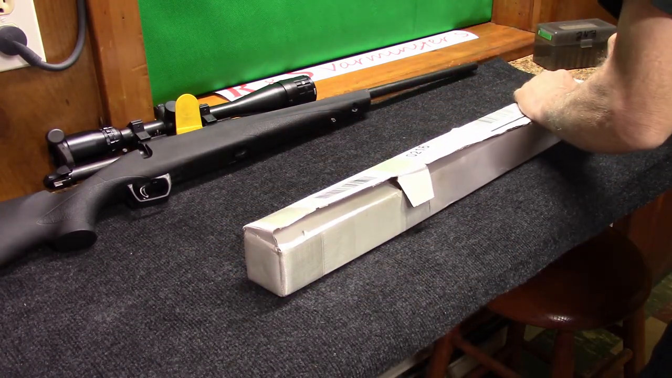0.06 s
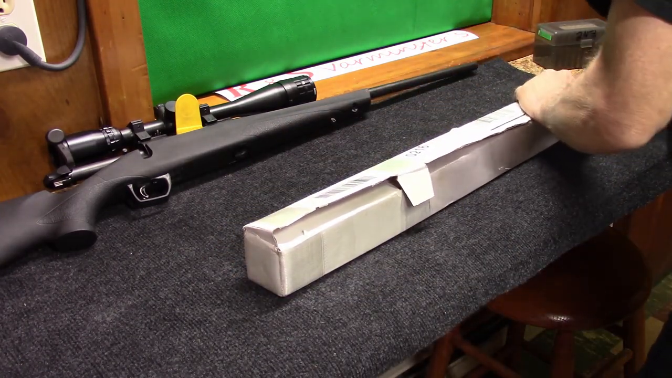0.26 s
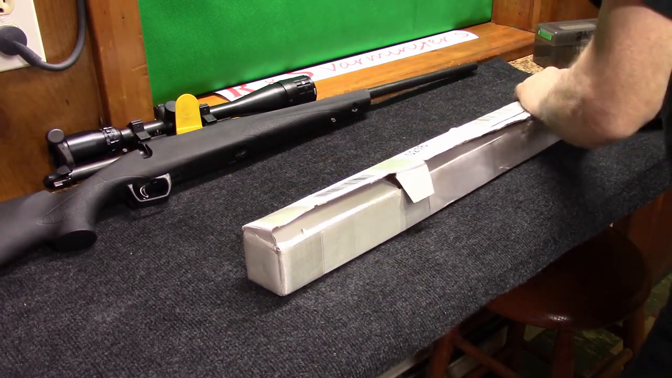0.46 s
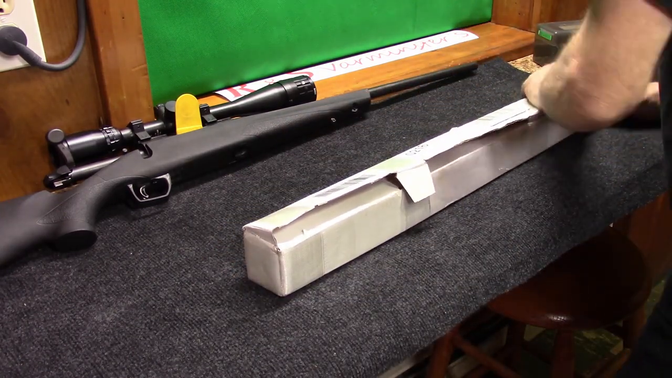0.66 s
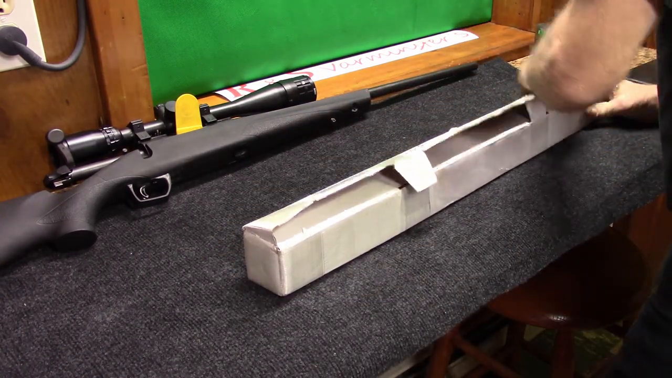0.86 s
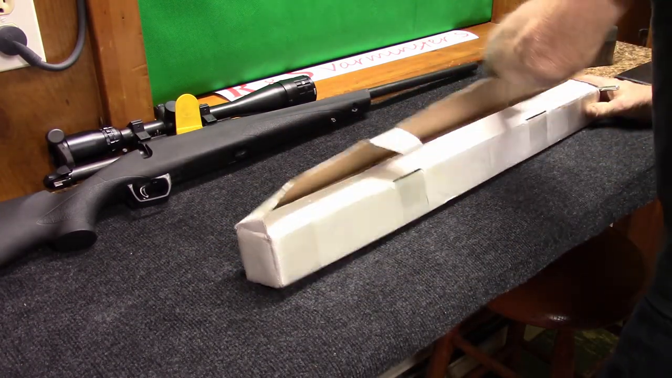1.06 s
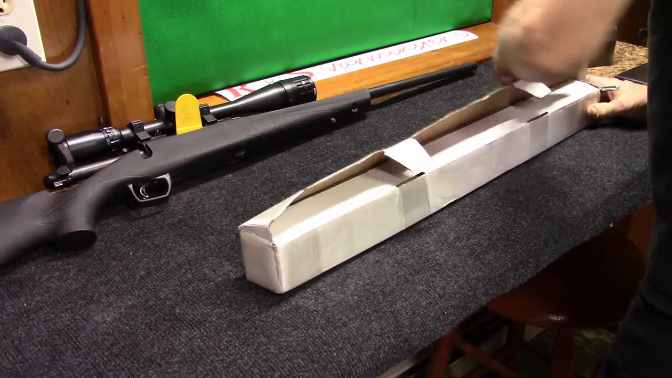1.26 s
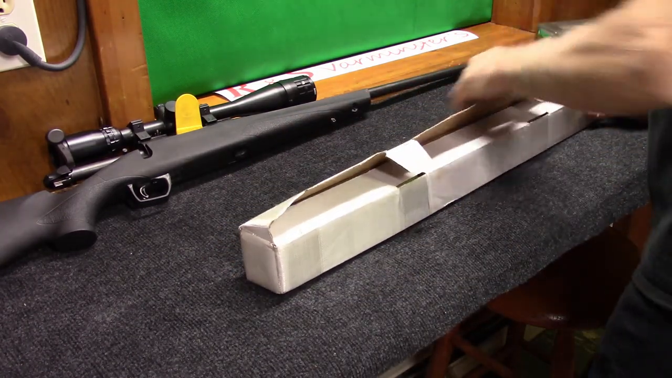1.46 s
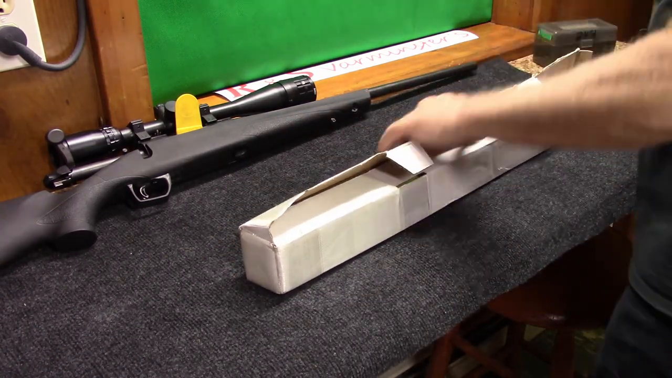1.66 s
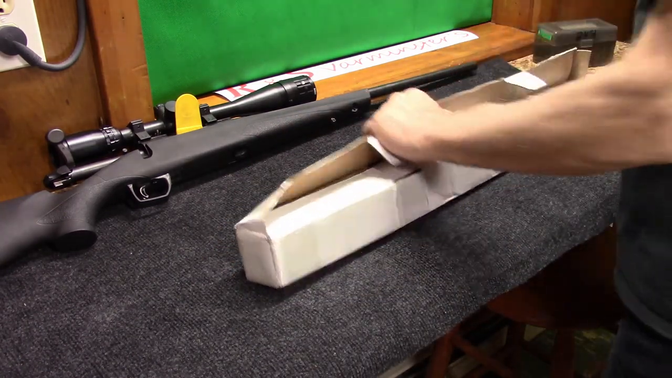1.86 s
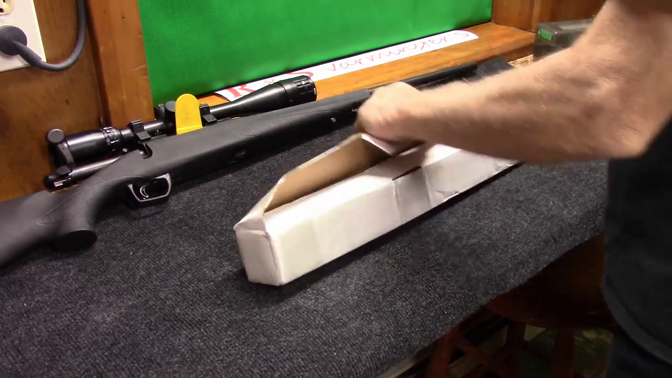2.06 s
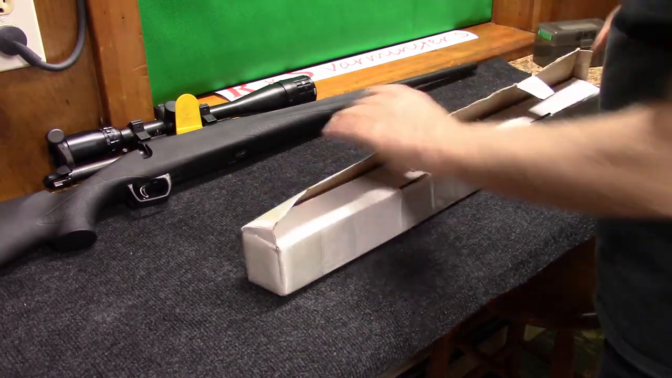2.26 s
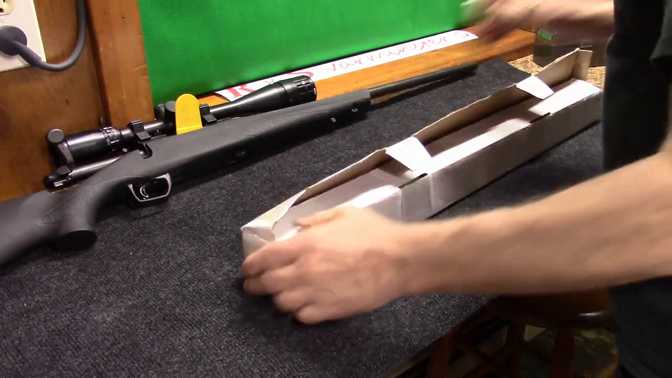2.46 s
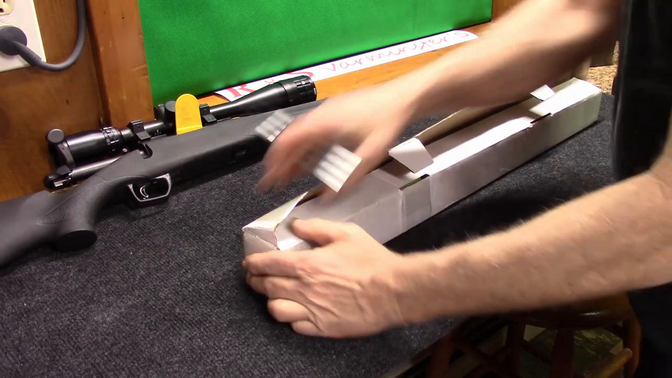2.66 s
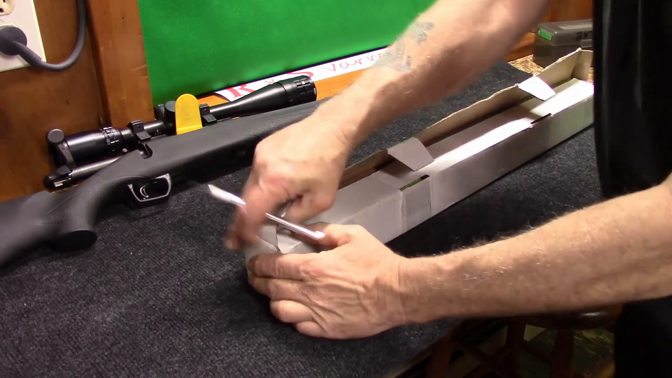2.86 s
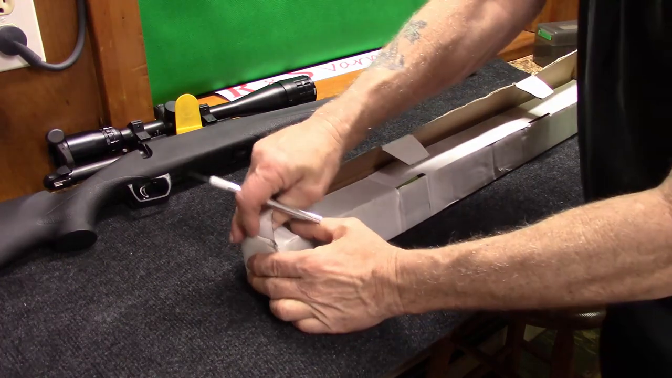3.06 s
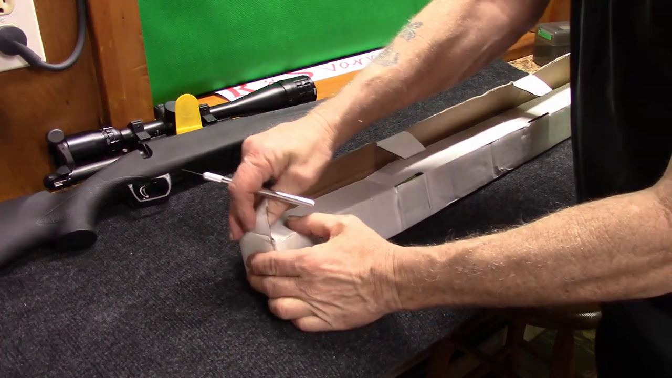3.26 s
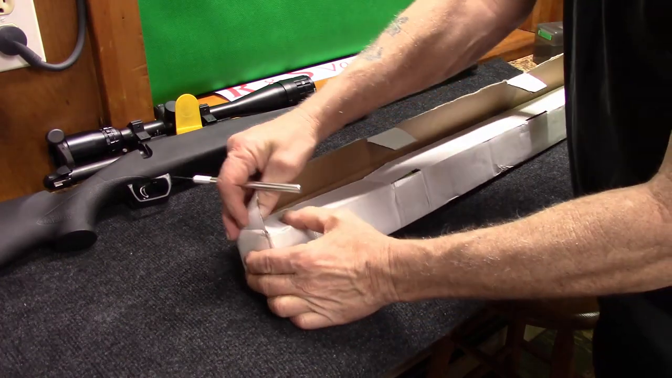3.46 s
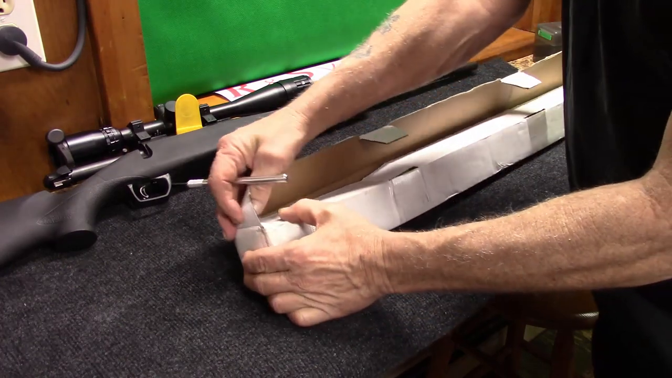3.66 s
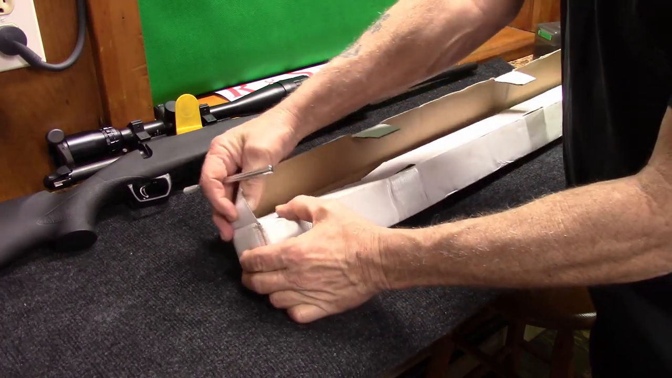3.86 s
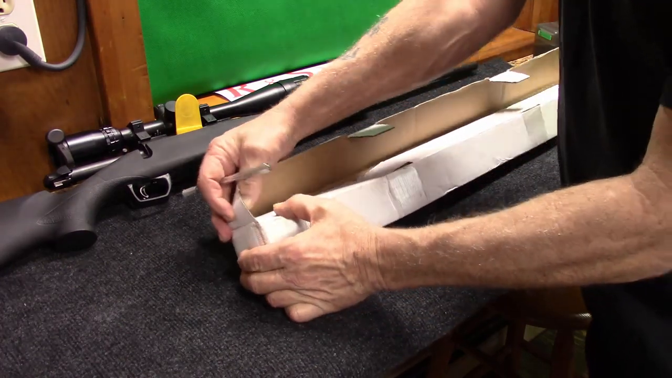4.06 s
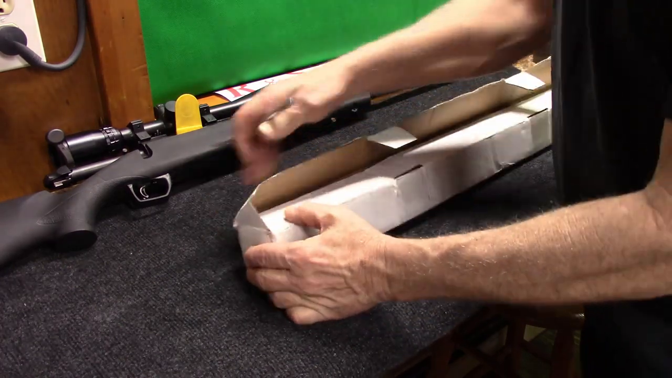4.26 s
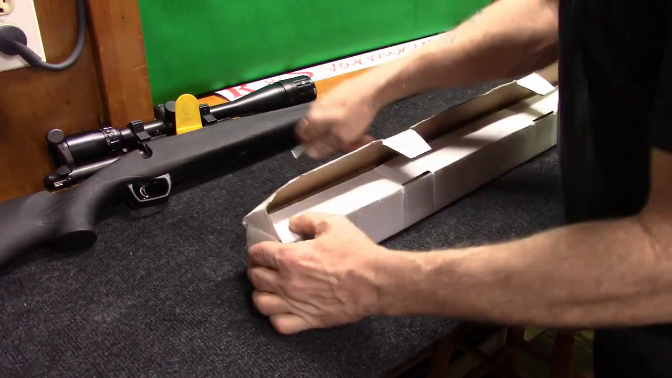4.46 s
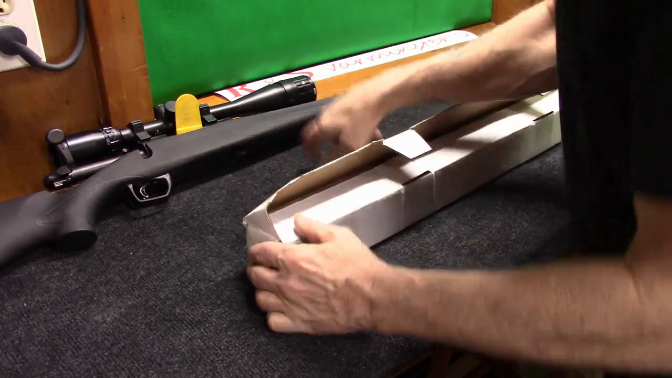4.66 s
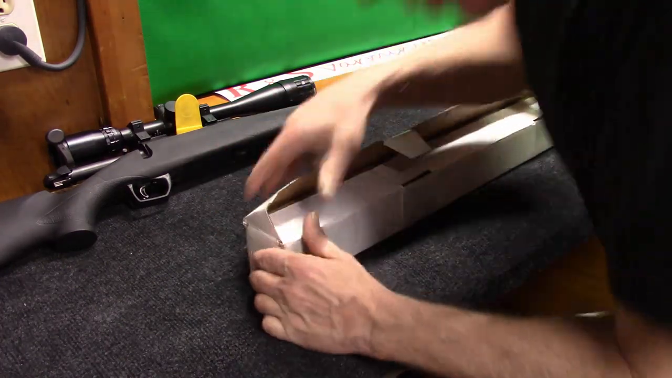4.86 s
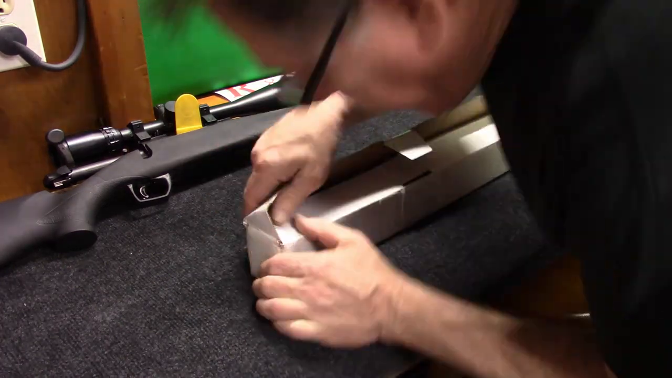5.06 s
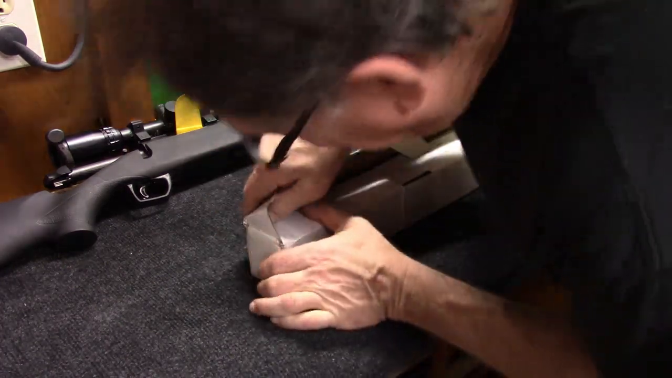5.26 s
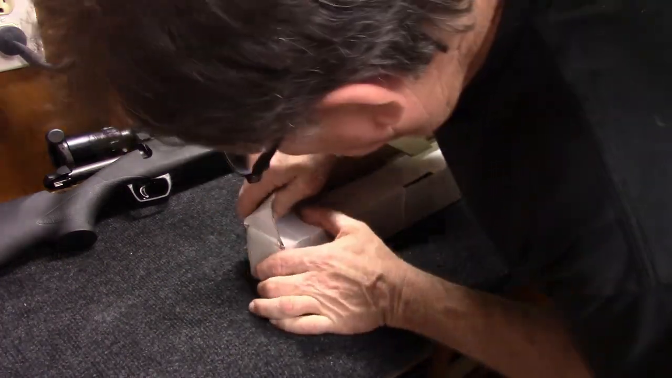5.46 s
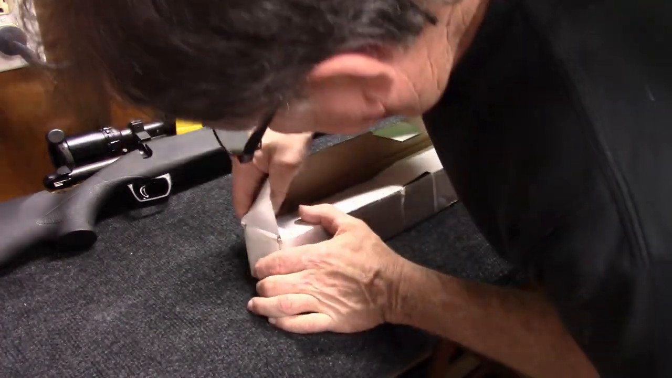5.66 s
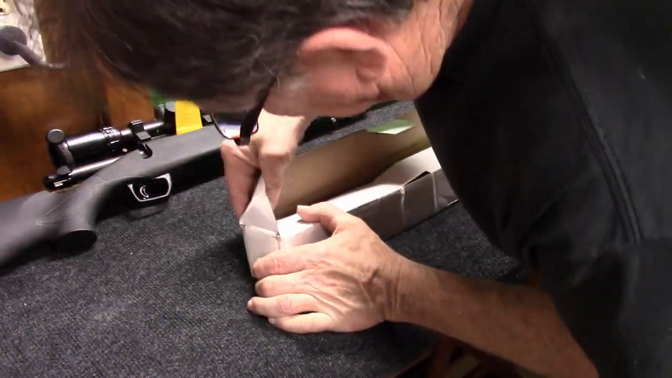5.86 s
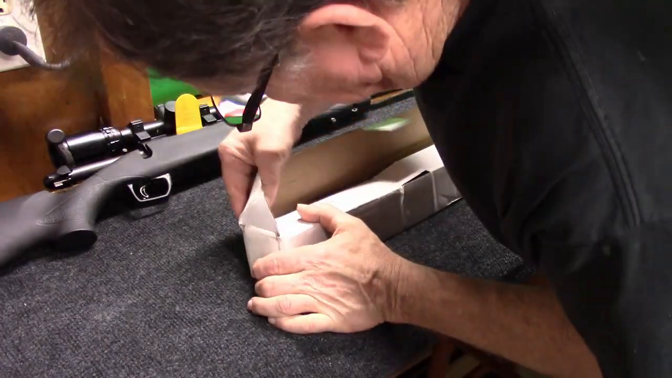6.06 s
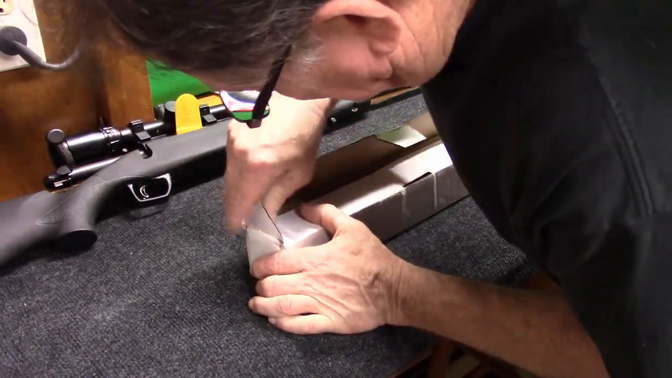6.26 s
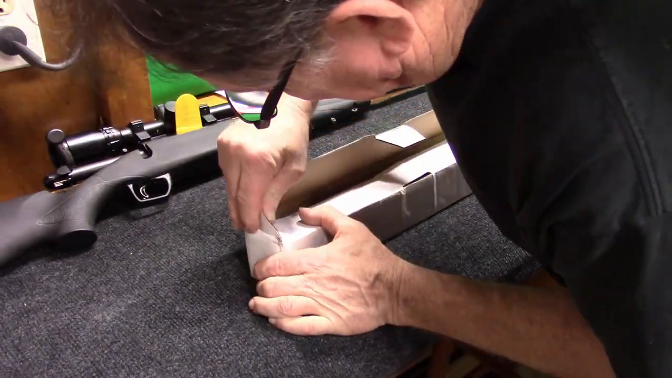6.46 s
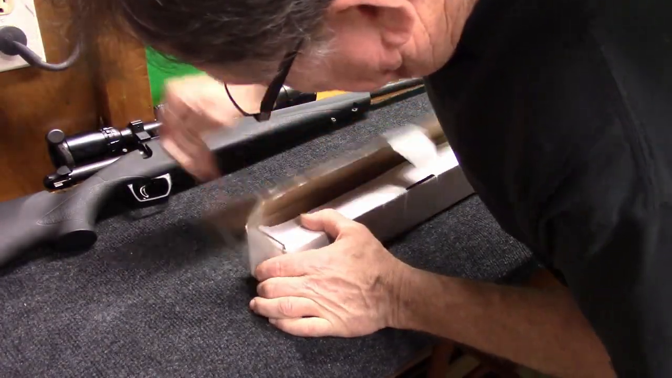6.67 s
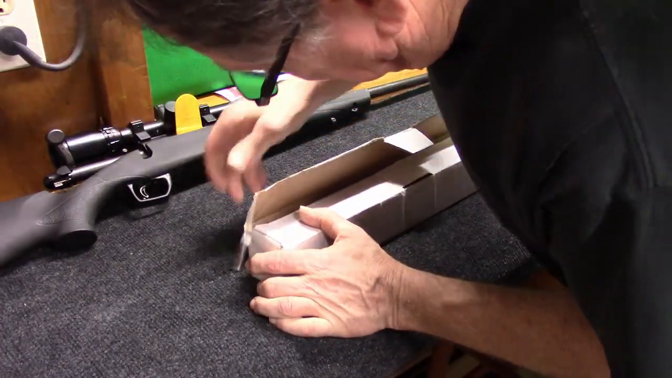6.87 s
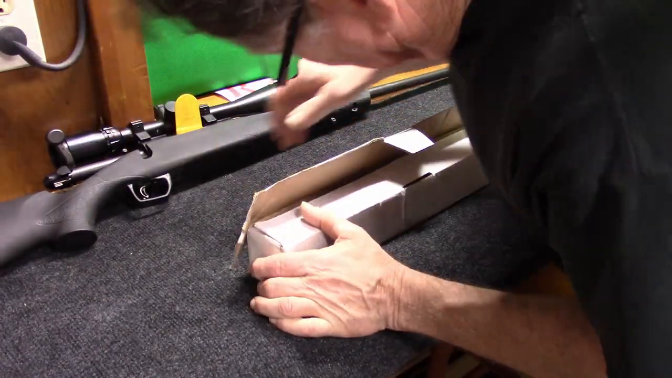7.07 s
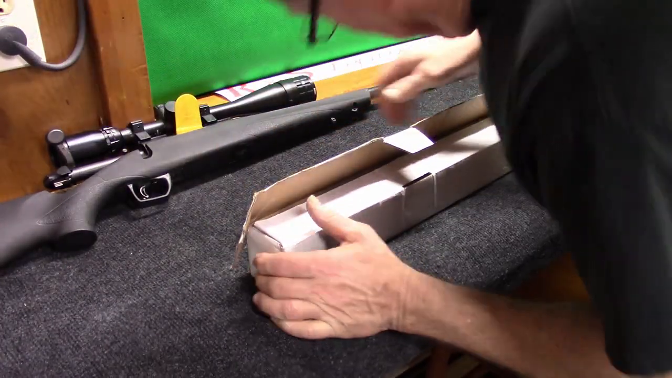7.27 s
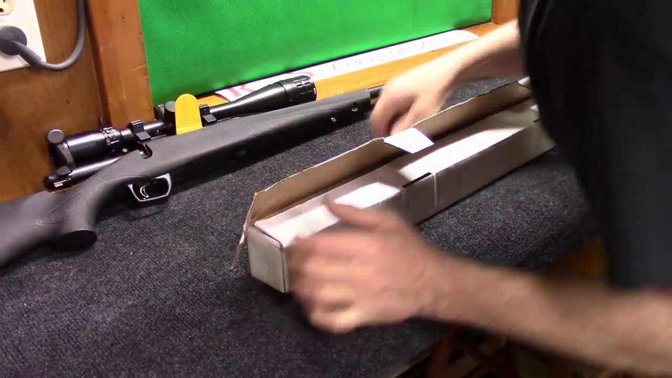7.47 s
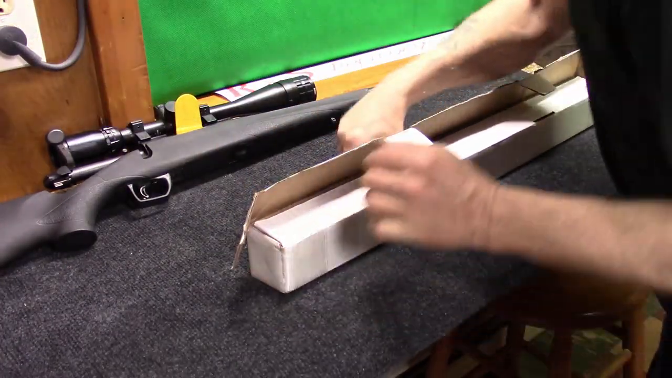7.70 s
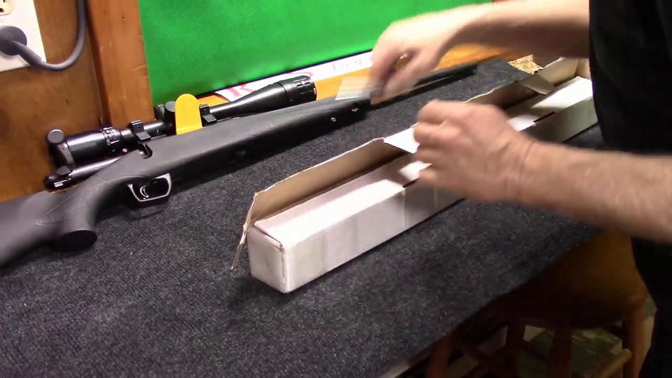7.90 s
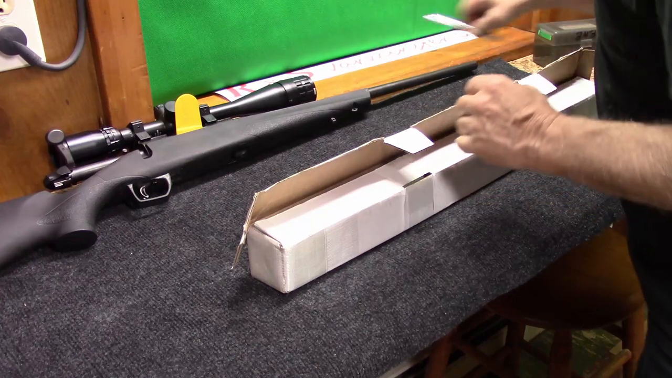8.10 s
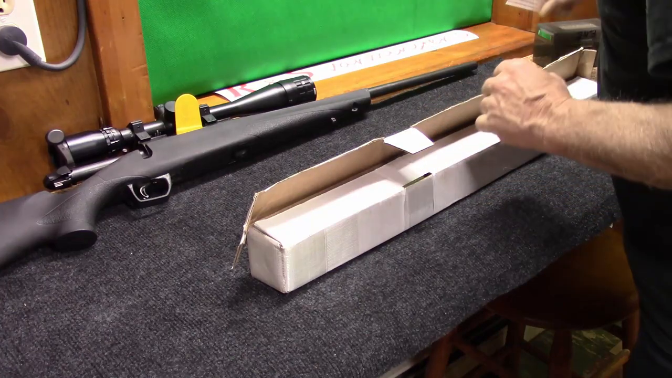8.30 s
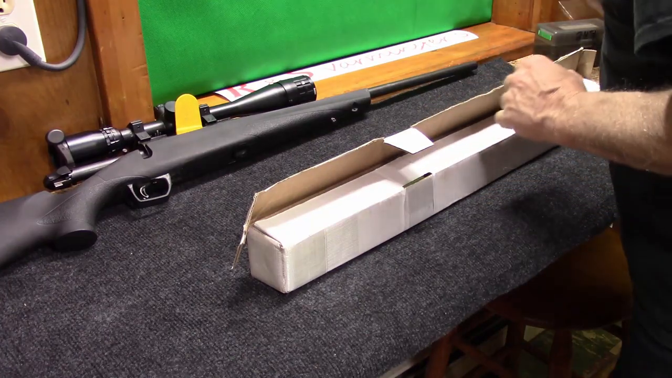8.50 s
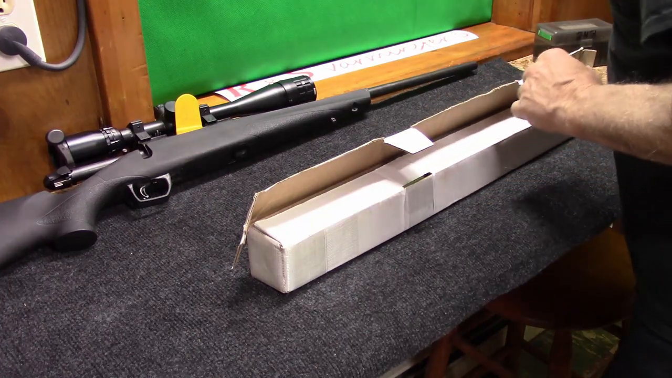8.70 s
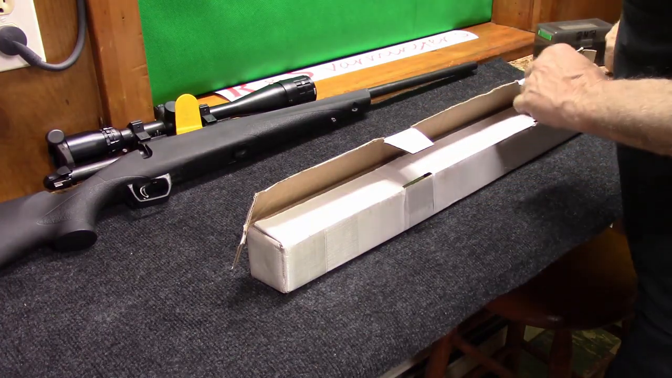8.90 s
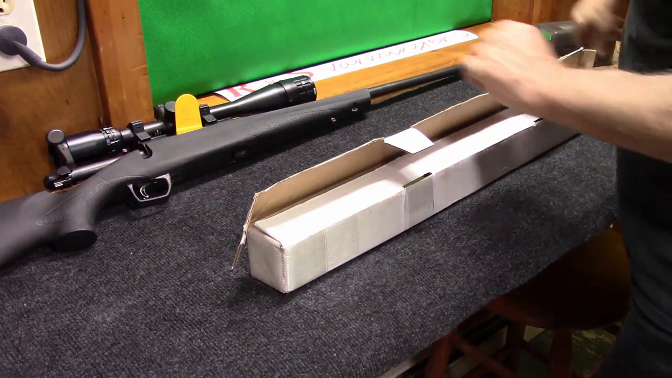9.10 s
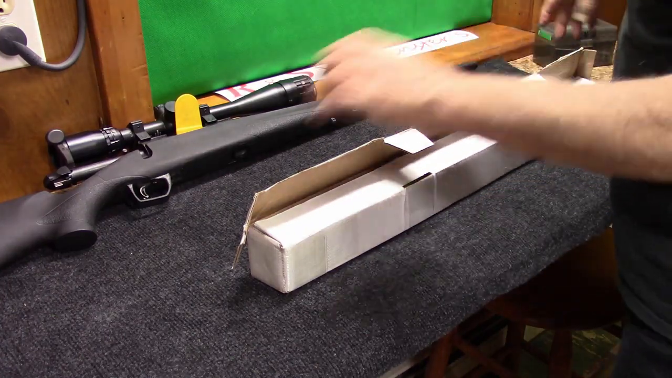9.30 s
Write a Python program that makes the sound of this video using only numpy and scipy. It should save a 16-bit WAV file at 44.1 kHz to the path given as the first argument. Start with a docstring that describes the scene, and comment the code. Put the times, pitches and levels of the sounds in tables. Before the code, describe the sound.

A low steady rush and faint quick motor ticking sit behind a long cardboard box being opened on a bench. A flap scrapes, then rips free with a loud crack. Hands slide over the board, a knife saws in short rasps, and the end tears with hard hollow snaps. Later the knife clacks down at a distance and a sleeve swishes. Close microphone, small short-decay room.

```python
"""A steady low rush, a faintly ticking motor and a scraping flap open the scene in a small workshop.
A long cardboard box is opened on a bench: creases snap, tape and board rip, the hollow box thumps,
hands slide over the board and a knife saws at the tape. Late on the knife is put down and a sleeve brushes past.
Rubbing is shaped noise and clicks under pressure curves; blows are noise bursts and decaying modes;
all but the rush, the motor and the bench pass through a synthetic stereo room."""
import sys
import numpy as np
from scipy import signal
from scipy.fft import rfft, irfft, next_fast_len
from scipy.io import wavfile

SR = 44100
rng = np.random.default_rng(int(sys.argv[2]) if len(sys.argv) > 2 else 0)


def put_to_file(sound):
    """Save the sound as 16-bit audio at rate SR, in the file named by the first command-line argument."""
    columns = np.atleast_2d(sound).T  # one column per channel
    safe = np.clip(columns, -1, 1)
    whole_steps = np.round(safe * 32767)
    wavfile.write(sys.argv[1], SR, whole_steps.astype(np.int16))


N = 411894
TIME = np.arange(N) / SR
TAIL = TIME[:SR // 2]  # time axis of a single event, half a second

# Strokes of the far flap scraping along the box. Each row: start in seconds, rise in seconds,
# hold in seconds, then the levels in dB of the low drag, the middle rasp and the high hiss.
SCRAPES = [(0.0, 0.041, 0.047, -40, -48, -60.5), (0.109, 0.031, 0.007, -37, -44.5, -50),
           (0.249, 0.052, .01, -48.5, -58, -58.5), (.405, 0.012, 0.033, -42, -46.5, -48),
           (.45, .02, .045, -34.5, -40, -44), (.565, .02, 0.16, -44.5, -50.5, -52.5),
           (.7, 0.036, 0.064, -37, -49, -57)]
# Strokes of hands and flaps sliding. Each row: start, rise and hold in seconds,
# drag on the panels, rasp of the edges and hiss of the surface in dB.
SLIDES = [(.93, 0.024, 0.095, -52.5, -54.5, -56.5), (1.162, 0.01, .19, -48.5, -50.5, -56),
          (1.24, 0.043, 0.067, -59, -63, -48.5), (1.585, 0.023, .07, -50.5, -54, -54),
          (1.66, 0.021, 0.026, -47.5, -51, -49.5), (1.77, 0.0065, 0.0093, -53, -58.5, -66),
          (1.82, 0.14, 0.047, -45.5, -53.5, -57.5), (2.08, 0.026, 0.053, -46.5, -53, -57.5),
          (2.18, .02, 0.086, -55, -65.5, -68.5), (2.455, 0.014, 0.08, -49.5, -52, -53),
          (2.615, .02, 0.13, -50, -53.5, -53.5), (2.76, 0.028, 0.15, -45, -52, -62),
          (2.93, 0.035, 0.14, -51.5, -58, -61), (4.05, 0.083, 0.018, -41.5, -49.5, -51),
          (4.18, 0.043, 0.078, -50, -60, -64), (4.285, 0.012, 0.026, -42.5, -47.5, -52.5),
          (4.43, 0.029, 0.0084, -51.5, -56.5, -59), (4.49, 0.033, 0.031, -55.5, -59, -67),
          (4.62, 0.023, .04, -51.5, -60, -64.5), (4.76, 0.09, 0.076, -60, -64, -68),
          (4.96, 0.02, .14, -48.5, -57.5, -60), (5.17, 0.078, 0.026, -44, -50, -53.5),
          (5.33, 0.084, 0.064, -50.5, -61.5, -67), (5.45, 0.055, 0.022, -49.5, -52.5, -57),
          (6.03, .11, .03, -46, -51, -56.5), (6.235, .03, 0.017, -44, -51, -50.5),
          (6.32, .03, 0.11, -53, -64.5, -74), (6.42, 0.063, .03, -44.5, -59.5, -64),
          (6.79, .03, 0.079, -53, -74, -73), (6.93, 0.052, 0.087, -56, -68, -73),
          (7.062, .008, 0.017, -44.5, -51, -66), (7.16, .012, 0.013, -51, -56.5, -59)]
# Resonances of the box. Each row: frequency in Hz, width in Hz, height in dB.
BOX = [(335, 7.7, 5.5), (439, 18, 3), (600, 11, 4.5), (693, 26, 3.5), (1070, 440, 1), (1420, 360, 1),
       (1930, 46, 2.5), (2300, 280, 1), (2710, 170, 1)]


def undb(db):
    """Level to amplitude: 20 dB is a factor of ten."""
    return 10 ** (np.asarray(db) / 20)


def unit(x):
    """Normalization of a steady signal to rms 1."""
    return x / np.sqrt(np.mean(x ** 2))


def burst(x):
    """Normalization of a transient by energy, to that of 4 ms at rms 1."""
    return x / np.sqrt(np.sum(x ** 2) / (.004 * SR))


def add(out, s, x):
    """Superposition: mix x in at time s."""
    i = int(s * SR)
    out[..., i:i + x.shape[-1]] += x[..., :N - i]


def band(x, lo_hz, hi_hz):
    """Causal band-pass: only components between two frequencies remain strong."""
    return signal.sosfilt(signal.butter(3, [lo_hz, hi_hz], "band", fs=SR, output="sos"), x)


def colour(x, points, modes=()):
    """Minimum-phase filtering: a smooth spectrum of (Hz, dB) points with resonances on top."""
    size = next_fast_len(len(x) // 2 + 1) * 2
    hz = np.maximum(np.arange(size // 2 + 1) * SR / size, 1)
    f, db = np.transpose(points)
    db = np.interp(np.log(hz), np.log(f), db)
    for centre, width, height_db in modes:
        db = db + height_db / (1 + (2 * (hz - centre) / width) ** 2)
    # folding the cepstrum onto positive times makes the filter causal
    cepstrum = irfft(np.log(undb(db)))
    cepstrum[1:size // 2] *= 2
    cepstrum[size // 2 + 1:] = 0
    response = np.exp(rfft(cepstrum))
    return irfft(rfft(x, size) * response)[:len(x)]


def split(x, order=5):
    """Complementary band division: low, middle and high parts that add up to the whole."""
    mid_hz, high_hz = 1600, 4600
    spectrum = rfft(x)
    hz = np.arange(len(spectrum)) * SR / len(x)
    low, below = (irfft(spectrum / (1 + (hz / edge) ** (2 * order)), len(x)) for edge in (mid_hz, high_hz))
    return low, below - low, x - below


def wander(t, rate, count=1000):
    """Slow random modulation: normal values, rate of them a second, joined by straight lines."""
    return np.interp(t * rate, np.arange(count), rng.standard_normal(count))


def room(wet_db, side_db=-20.5, build_s=0.0017):
    """Reverberation: direct sound, then dense reflections that decay at a rate set by frequency band."""
    # Reverberation times in seconds of the low, middle and high bands.
    decay_t60 = (0.21, 0.19, 0.15)
    decays = undb(-60 * TAIL / np.array(decay_t60)[:, None])
    fades = decays * (1 - np.exp(-TAIL / build_s))
    mid, side = (np.sum(fades * split(rng.standard_normal(len(TAIL))), axis=0) for _ in range(2))
    # the treble spreads sideways most
    side_spectrum = [(60, -9.5), (280, -19), (600, -5.5), (1200, 0.5), (2300, 3.5), (4200, 10.0), (12000, 8.5)]
    side = undb(side_db) * colour(side, side_spectrum)
    response = undb(wet_db) * np.array([mid + side, mid - side]) / np.sqrt(np.sum(mid ** 2))
    response[:, 0] += 1
    return response / np.sqrt(1 + undb(2 * wet_db))


def heard(x, response):
    """Convolution: every instant of the sound excites the room's response."""
    return signal.fftconvolve(x[None], response, axes=1)[:, :N]


def stroke(t, rise_s, hold_s, release_db_s):
    """Contact pressure: it builds, holds, then lets go exponentially."""
    build = np.clip(t / rise_s, 0, 1) ** 0.99
    return build * undb(-release_db_s * np.maximum(t - rise_s - hold_s, 0))


def friction(strokes, spectrum, release_db_s, rate, spread_db, smooth, catch_db, catch_rate, wet_db):
    """Stick-slip friction: fibres catch and let go as tiny uneven clicks that shake the panels, rasp and hiss."""
    out, size = np.zeros((2, N)), len(TAIL)
    for s, rise_s, hold_s, *levels in strokes:
        moments = rng.random(size) < rate / SR  # rate is the mean number of slips a second
        signs = rng.choice([-1, 1], size)
        sizes = undb(spread_db * np.minimum(rng.standard_normal(size), 2))
        force = unit(moments * signs * sizes) + smooth * rng.standard_normal(size)
        force = force * undb(catch_db * wander(TAIL, catch_rate))
        parts = split(colour(force, spectrum, BOX))
        sound = sum(unit(part) * undb(db) for part, db in zip(parts, levels))
        add(out, s, heard(sound * stroke(TAIL, rise_s, hold_s, release_db_s), room(wet_db)))
    return out


def air(level_db=-58.5, side_db=-16):
    """Broadband background noise: the steady low rush of the workshop, wavering slightly."""
    # Spectrum of the rush. Each row: frequency in Hz, relative level in dB.
    rush_spectrum = [(15, -40), (25, -22), (74, -14.5), (130, -10.5), (217, -7.5), (293, -12), (335, -4.5),
                     (384, -8.5), (416, -8), (591, -9.5), (1260, -15.5), (1480, -13.5), (1790, -17),
                     (5730, -24.5), (16000, -38)]
    modes = [(333, 190, 3.1), (420, 92, 2.5)]
    mid, side = (unit(colour(rng.standard_normal(N), rush_spectrum, modes)) for _ in range(2))
    side_spectrum = [(30, 3.5), (120, 7.5), (350, 7), (1500, 6.5), (5000, 7.5), (14000, 0.5)]
    side = undb(side_db) * colour(side, side_spectrum)
    waver_db = .4 * wander(TIME, 5)
    return np.array([mid + side, mid - side]) * undb(level_db + waver_db)


def motor(db=-57, tick_s=0.0051):
    """Periodic excitation: even, decaying ticks of mechanical noise, alternately stronger and weaker."""
    # Spectrum of the ticks. Each row: frequency in Hz, relative level in dB.
    tick_spectrum = [(300, -19.5), (1100, -22), (1550, 10), (2000, -8), (2800, -7.5), (4000, -12.5),
                     (12000, -28.5)]
    ticks_per_s, phase_s = 14.985, .0605
    turn = (TIME - phase_s) * ticks_per_s
    since_tick_s = turn % 1 / ticks_per_s
    gate = np.exp(-since_tick_s / tick_s) * undb(-2.5 * (np.floor(turn) % 2))
    return undb(db) * unit(colour(rng.standard_normal(N), tick_spectrum)) * gate


def flap():
    """Stick-slip friction of board on board: the far flap scrapes along the box."""
    # Spectrum of the scrape. Each row: frequency in Hz, relative level in dB.
    scrape_spectrum = [(90, -25.5), (200, -19), (300, -6), (550, 3.5), (750, 2), (1100, 1.5), (1600, -3.5),
                       (2100, -4), (3000, -12), (3600, -11), (5200, -20), (7800, -30), (9600, -29.5),
                       (15500, -53)]
    return friction(SCRAPES, scrape_spectrum, release_db_s=259, rate=1500, spread_db=3.0, smooth=0.55,
                    catch_db=3.0, catch_rate=150, wet_db=-6.5)


def crinkles(strokes):
    """Random events: rubbed creases give way, likelier in long strokes and louder in firm ones."""
    per_s = 8
    level_db, spread_db = 0.5, 2.5  # relative to the stroke's drag
    boom_db, crack_db, tick_db = 1, -9, -17
    rows = []
    for (s, rise_s, hold_s, drag_db, *_), (luck, when, size) in zip(strokes, rng.random((len(strokes), 3))):
        span = rise_s / 2 + hold_s
        if luck < per_s * span:
            moment = s + rise_s / 2 + when * span
            db = drag_db + level_db + spread_db * (2 * size - 1)
            rows.append((moment, db, boom_db, crack_db, tick_db))
    return rows


def snaps(crinkle_rows, crumple=0.13, crumple_s=0.0049, wet_db=-5, tick_wet_db=-9, knock_db=2):
    """Impulsive excitation: a giving crease rings the box with one kick and a few ms of breaking fibres."""
    # Flaps and creases snapping. Each row: start in seconds, overall gain in dB, low-end tilt (boom) in dB,
    # high-end tilt (crack) in dB, gain of the fibre tick in dB.
    snap_rows = [(.181, -43, 13, -20, -27), (.314, -48.5, 8.5, 3, 2), (.613, -42.5, 5, 4, 0),
                 (.6585, -43, -12, 3, 6), (.738, -24.5, -8, -16, -25), (.463, -36.5, -23, 0, -1),
                 (.711, -50, -6, 10, -3), (.8757, -6, 1, -2, -28), (.8796, -17.5, 5, 5, -16),
                 (.893, -23, 8, -5, -22), (1.007, -34, 0, -2.5, -12), (1.044, -54.5, -6, -2, 8),
                 (1.162, -41.5, -4, 3, -8), (1.178, -40, -12, 4, -5), (1.375, -27.5, -6, -19, -12),
                 (1.4114, -22, 4, -4, -14), (2.0275, -25.5, 2, 3.5, -29), (2.1476, -29, -3.5, -9, -15),
                 (2.738, -27.5, 6, -3.5, -20), (2.863, -43.5, -2, 10, -10), (2.9, -45, -15, 10, -7),
                 (2.935, -45, -6, 6, -8), (3.316, -40, -12, -10, -24), (3.5866, -31, -5, -8.5, -31),
                 (3.6962, -28.5, -13, -24, -40), (3.803, -32, -16, -1.5, -27),
                 (3.8241, -24.5, -13, -21, -32), (3.987, -42.5, 3, -5, -14), (4.224, -46, 9.5, -15, -24),
                 (4.305, -44.5, -6, 4, 2), (4.338, -44, 5, -10, -14), (4.683, -37, 4, -10, -36),
                 (5.2685, -33.5, -20, -9, -10), (5.5423, -36, -7, -10, -11), (5.6348, -32.5, -10, -8, -16),
                 (5.7302, -29, -12, -17.5, -23), (5.8232, -41.5, 3.5, -8, -5.5),
                 (5.8942, -6, -19, 2.5, -24), (5.953, -20.5, -8, 5, -11), (6.1521, -49, -12, -7, -12),
                 (6.174, -46, -20, -13, 12.5), (6.201, -46, -3, -9, 6), (6.5215, -33, -9, -18, -23),
                 (6.5445, -20.5, -22, -25, -14), (6.5835, -23, -3, -2, -14),
                 (6.6887, -17, -10.5, -9.5, -10.5), (6.7237, -21, -19.5, 3.5, -32),
                 (6.7265, -18, -15, -26, -30), (7.0684, -40, -3, 1, -8.5), (7.2006, -38, -19, -9, -18),
                 (7.8885, -61, -4, 8, 6), (8.8936, -26, -31, -3, -17)]
    # Spectrum of the struck board. Each row: frequency in Hz, relative level in dB.
    snap_spectrum = [(60, -30.5), (110, -21.5), (180, -5.5), (300, 6.5), (450, 6.5), (700, 6), (900, -1),
                     (1300, 0), (1700, -3), (2400, -2), (3200, -5.5), (4400, -15), (9500, -24.5),
                     (15500, -63)]
    tick_spectrum = [(2500, -21), (5000, 6), (9700, -1.5), (15500, -16)]
    out, t = np.zeros((2, N)), TAIL[:SR // 8]
    for s, db, boom_db, crack_db, tick_db in snap_rows + crinkle_rows:
        force = crumple * rng.standard_normal(len(t)) * np.exp(-t / crumple_s)
        force[0] -= 1  # the kick
        board = undb(knock_db) * burst(colour(force, snap_spectrum, BOX))
        knock = colour(board, [(380, boom_db), (520, 0.01), (1350, 0.0011), (1900, crack_db)])
        fibres = rng.standard_normal(len(t)) * np.exp(-t / 0.0048)
        tick = undb(tick_db) * burst(colour(fibres, tick_spectrum))
        # the tick beams straight ahead, so it stirs the room less
        add(out, s, undb(db) * (heard(knock, room(wet_db)) + heard(tick, room(tick_wet_db))))
    return out


def ripping():
    """Fracture in tugs: tape and board rip as fibres let go in quick succession."""
    # Tugs. Each row: start, rise and hold in seconds, low drag, middle rasp and high hiss in dB.
    tugs = [(.785, 0.047, 0.0055, -29.5, -37, -40), (.822, 0.026, 0.02, -20.5, -27, -28),
            (1.365, 0.019, 0.035, -36.5, -46.5, -40.5), (2.012, .012, 0.0037, -34, -38, -44),
            (2.72, 0.026, 0.017, -32.5, -44.5, -53.5), (6.51, 0.041, 0.0062, -30.5, -39.5, -45),
            (6.568, 0.012, 0.019, -25.5, -33, -27), (6.602, 0.0049, 0.0037, -22.5, -27.5, -26),
            (6.632, 0.0058, 0.0062, -31, -35.5, -28)]
    # Spectrum of the rip. Each row: frequency in Hz, relative level in dB.
    rip_spectrum = [(59, -53), (100, -37), (215, -17), (433, -1.5), (752, -7), (818, -2), (1230, -5.5),
                    (1680, -7.5), (2370, 1.5), (2990, -3), (3320, -2), (4870, -19.5), (6420, -21),
                    (10000, -23), (16000, -46)]
    return friction(tugs, rip_spectrum, release_db_s=425, rate=1400, spread_db=3.5, smooth=1.0,
                    catch_db=4.5, catch_rate=262, wet_db=-9.0)


def thumps(rise_cycles=0.8, wet_db=-9):
    """Modal vibration: a blow swings the panel modes nearest its pitch, and they die away trembling a little."""
    # The hollow box flexing or knocking. Each row: start in seconds, level in dB,
    # pitch of the panels struck in Hz, decay time by 60 dB in seconds.
    blows = [(.876, -20, 178, 0.13), (.88, -14, 417, 0.18), (1.381, -27, 1825, .07), (1.41, -34, 390, .13),
             (2.021, -13, 331, 0.081), (2.023, -28.5, 178, .09), (2.148, -47, 175, 0.081),
             (2.739, -37, 245, 0.17), (4.68, -32.5, 238, 0.11), (5.896, -19, 450, 0.15),
             (5.937, -36.5, 238, 0.36), (5.953, -12.5, 600, 0.083), (6.583, -36, 195, 0.4),
             (6.689, -10, 1270, 0.019), (6.7255, -18, 700, .02), (7.071, -32, 302, 0.49),
             (7.13, -32, 298, 0.19), (7.242, -51.5, 137, .29)]
    # Frequencies of the panel modes in Hz.
    panel_hz = [140, 176, 240, 302, 345, 398, 437, 597, 695, 1270, 1825]
    span_octaves, flutter = 0.11, .22
    out, modes = np.zeros((2, N)), np.array(panel_hz)
    for s, db, hz, t60 in blows:
        shares = np.exp(-abs(np.log2(modes / hz)) / span_octaves)
        ring = shares @ np.sin(2 * np.pi * modes[:, None] * TAIL) / np.linalg.norm(shares)
        tremble = unit(band(rng.standard_normal(len(TAIL)), hz / 2, hz * 2))
        envelope = (1 - np.exp(-TAIL * hz / rise_cycles)) * undb(-60 * TAIL / t60)
        swing = (ring + flutter * tremble) * envelope
        add(out, s, undb(db) * heard(swing, room(wet_db)))
    return out


def hands():
    """Stick-slip friction of skin and board: hands and flaps slide softly."""
    # Spectrum of the slide. Each row: frequency in Hz, relative level in dB.
    slide_spectrum = [(53, -55), (90, -20), (172, -16.5), (316, -4), (478, -4), (896, -4), (1190, -7.5),
                      (1290, -9.5), (2430, -16.5), (2950, -14), (4450, -19.5), (5070, -20), (7490, -21.5),
                      (9510, -20.5), (16000, -42.5)]
    return friction(SLIDES, slide_spectrum, release_db_s=172.5, rate=2200, spread_db=2.5, smooth=1.0,
                    catch_db=3.0, catch_rate=90, wet_db=-8.0)


def sawing():
    """Reciprocating contact: each stroke bites in, then drags with the same balance of rasp and hiss."""
    # The blade at the taped end. Each row: start in seconds, length in seconds, level of the drag in dB.
    cuts = [(3.052, 0.045, -39.5), (3.161, 0.073, -38.5), (3.272, 0.13, -40), (3.463, .05, -39),
            (3.568, 0.024, -32), (3.68, 0.021, -35.5), (3.744, 0.04, -40.5), (3.808, 0.042, -35.5),
            (3.883, 0.041, -36.5), (3.974, 0.028, -51.5), (5.624, 0.032, -39), (5.709, 0.038, -33),
            (5.809, 0.069, -40)]
    bite = 0.51  # share of a stroke spent biting in
    rasp_db, hiss_db = -13, -22.5  # relative to the drag
    return [(s, bite * length, (1 - bite) * length, db, db + rasp_db, db + hiss_db) for s, length, db in cuts]


def blade(strokes):
    """Stick-slip friction of an edge: sparse, uneven slips as the knife saws."""
    # Spectrum of the cut. Each row: frequency in Hz, relative level in dB.
    cut_spectrum = [(71, -54.5), (120, -26.5), (362, -11), (454, -1), (493, -0.5), (605, 1), (727, -15),
                    (789, 1), (968, -14.5), (1400, -15), (1790, -26), (2640, -24), (4140, -34.5),
                    (9210, -36.5), (16000, -64.5)]
    return friction(strokes, cut_spectrum, release_db_s=299.5, rate=950, spread_db=4.0, smooth=0.44,
                    catch_db=1.0, catch_rate=110, wet_db=-4.0)


def wall():
    """Fracture: the end wall tears open in a dense run of nearly equal breaks."""
    # Tears. Each row: start, rise and hold in seconds, low drag, middle rasp and high hiss in dB.
    tears = [(5.894, 0.0027, 0.037, -19, -20.5, -34.5), (5.945, 0.007, 0.0043, -23.5, -33, -38)]
    # Spectrum of the tear. Each row: frequency in Hz, relative level in dB.
    tear_spectrum = [(100, -47), (180, -47), (300, -10), (440, 1), (650, 1.5), (900, -10), (1150, -1),
                     (1650, -12.5), (2200, -3), (3100, -11.5), (3900, -19), (6000, -14), (8500, -25),
                     (15500, -49)]
    return friction(tears, tear_spectrum, release_db_s=384, rate=1100, spread_db=1.0, smooth=0.97,
                    catch_db=2.5, catch_rate=390, wet_db=-10)


def glue():
    """Adhesive release: tape peels off in a short hiss of very uneven slips."""
    # Peels. Each row: start, rise and hold in seconds, low drag, middle rasp and high hiss in dB.
    peels = [(6.163, 0.0093, 0.0073, -43, -43.5, -36.5), (7.555, 0.021, 0.03, -53.5, -55.5, -51.5)]
    # Spectrum of the peel. Each row: frequency in Hz, relative level in dB.
    peel_spectrum = [(150, -34), (600, 7), (1500, 1), (2200, -1), (3800, 0.5), (6000, -10), (8700, 5),
                     (10500, -4.5), (15500, -31)]
    return friction(peels, peel_spectrum, release_db_s=352, rate=840, spread_db=7.0, smooth=0.75,
                    catch_db=-5.0, catch_rate=390, wet_db=-5.0)


def bench(db=-47, start_s=6.58, length_s=0.49):
    """Forced vibration: the bench rumbles as low noise under the hardest pull."""
    swell = np.interp((TIME - start_s) / length_s, [0, .05, .4, .7, 1], [0, 1, .7, .2, 0], left=0, right=0)
    rumble_spectrum = [(25, -26), (45, -1), (70, -3), (110, 1), (160, -2.0), (260, 4), (500, -29), (2000, -70)]
    return undb(db) * swell * unit(colour(rng.standard_normal(N), rumble_spectrum))


def knife(chatter_s=0.0025, wet_db=4, gain_db=3):
    """Hard impact: contacts clack on wood and ring the steel; from further off the room is strong."""
    # The knife touching down, landing and rattling. Each row: start in seconds, level in dB before the
    # common gain, steel ring in dB relative to the clack, brightness (treble tilt) in dB.
    contacts = [(8.7845, -31.5, -29, -5.5), (8.7884, -32.5, -25, 0), (8.799, -34.5, -34, -10),
                (8.9171, -23.5, 2, 9), (8.9205, -26.5, -3, 5), (8.931, -34, -7, -10),
                (8.942, -35.5, -8, -1)]
    # Spectrum of the clack. Each row: frequency in Hz, relative level in dB.
    clack_spectrum = [(71, -75), (120, -33.5), (301, -14), (569, -7), (643, -8), (822, -2.5), (911, -11),
                      (1260, -4), (1830, -10.5), (2020, -12), (3380, -12), (9210, -24.5), (16000, -44.5)]
    # Modes of the blade. Each row: frequency in Hz, relative level in dB, decay time by 60 dB in seconds.
    steel_modes = [(3372, -19, .12), (4033, -20, .12), (9088, -17, .14)]
    out = np.zeros((2, N))
    for s, db, ring_db, bright_db in contacts:
        chatter = rng.standard_normal(len(TAIL)) * np.exp(-TAIL / chatter_s)
        clack = burst(colour(chatter, clack_spectrum))
        ring = np.zeros(len(TAIL))
        for hz, mode_db, t60 in steel_modes:
            ring += undb(mode_db) * burst(np.sin(2 * np.pi * hz * TAIL) * undb(-60 * TAIL / t60))
        contact = colour(clack, [(2000, 0), (9000, bright_db)]) + undb(ring_db) * ring
        add(out, s, undb(db + gain_db) * heard(contact, room(wet_db)))
    return out


def sleeve(start_s=9.15, db=-48.5):
    """Smooth friction: cloth brushes past as the arm lifts, a soft swish of noise without clicks."""
    # Spectrum of the swish. Each row: frequency in Hz, relative level in dB.
    brush_spectrum = [(200, -32), (1000, -11), (1700, -8), (2500, -0.5), (4000, -11), (6500, -8),
                      (8500, -17), (11000, -12.5), (15500, -43.5)]
    pressure = stroke(TIME - start_s, rise_s=.05, hold_s=0.026, release_db_s=270)
    swish = unit(colour(rng.standard_normal(N), brush_spectrum))
    return heard(undb(db) * pressure * swish, room(-5))


def scene():
    """Superposition of background, rubbing and blows."""
    saw_strokes = sawing()
    background = air() + motor() + bench()
    rubbing = flap() + ripping() + hands() + blade(saw_strokes) + wall() + glue() + sleeve()
    blows = snaps(crinkles(SLIDES + SCRAPES + saw_strokes)) + thumps() + knife()
    return background + rubbing + blows


def record(dry):
    """Saturation and band limiting: the loudest peaks are rounded and the top is cut."""
    top_hz = 15900
    rounded = dry / (1 + dry ** 4) ** .25
    return signal.sosfilt(signal.ellip(10, .1, 70, top_hz, fs=SR, output="sos"), rounded)


dry = scene()
out = record(dry)
put_to_file(out)
```